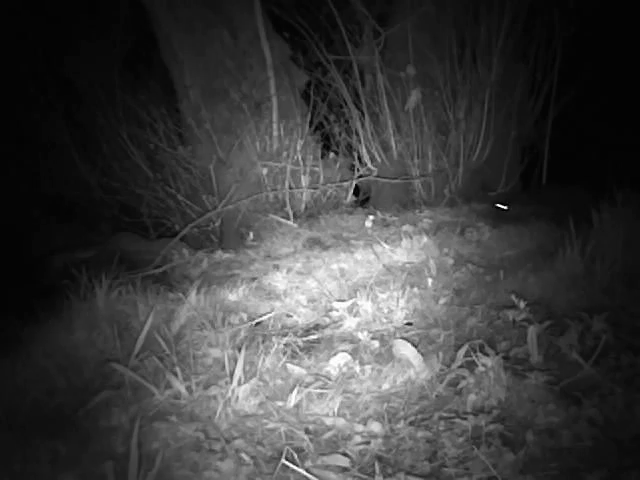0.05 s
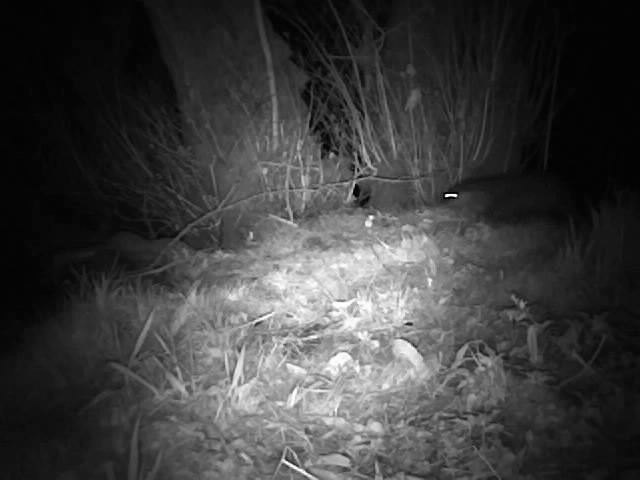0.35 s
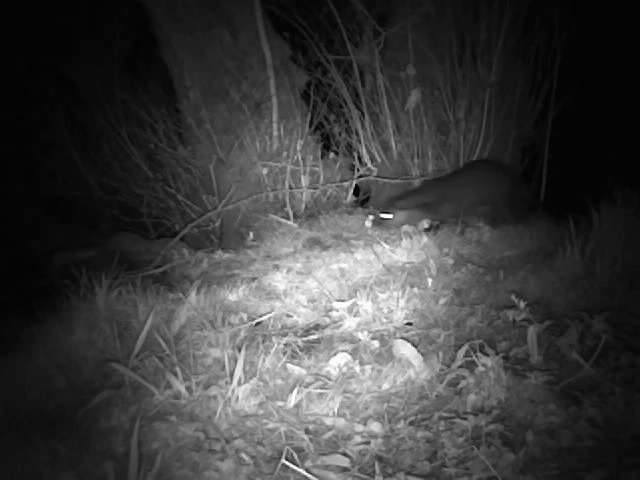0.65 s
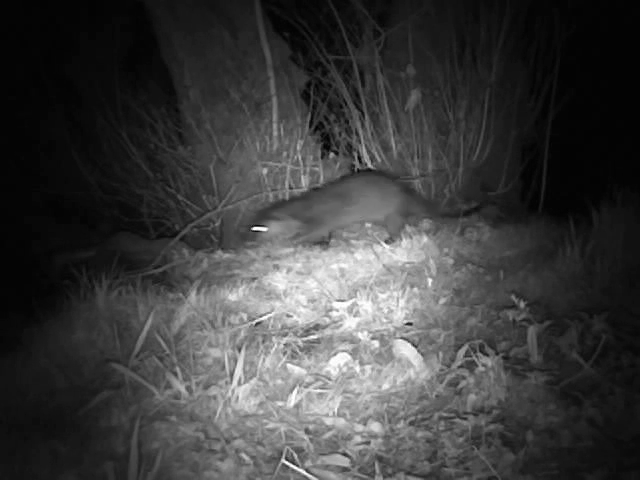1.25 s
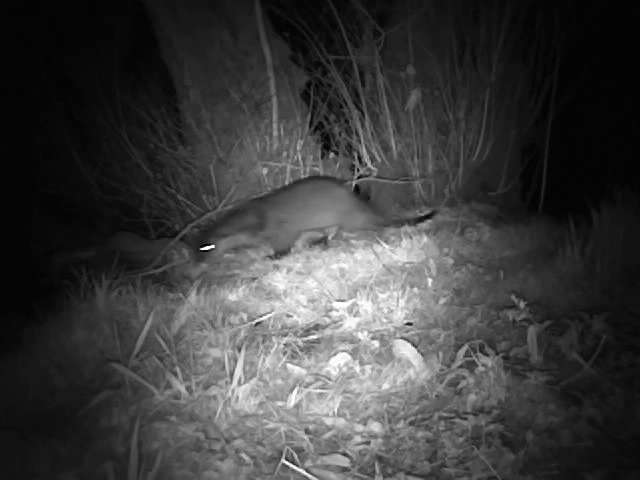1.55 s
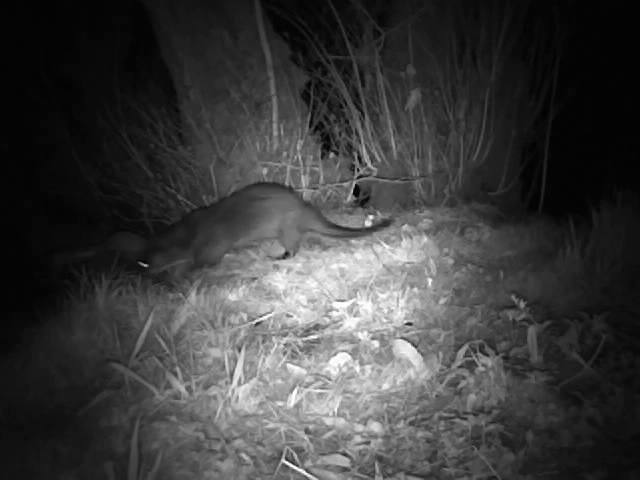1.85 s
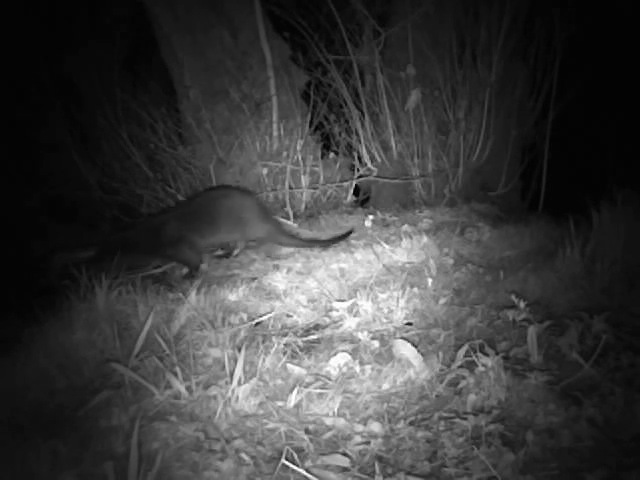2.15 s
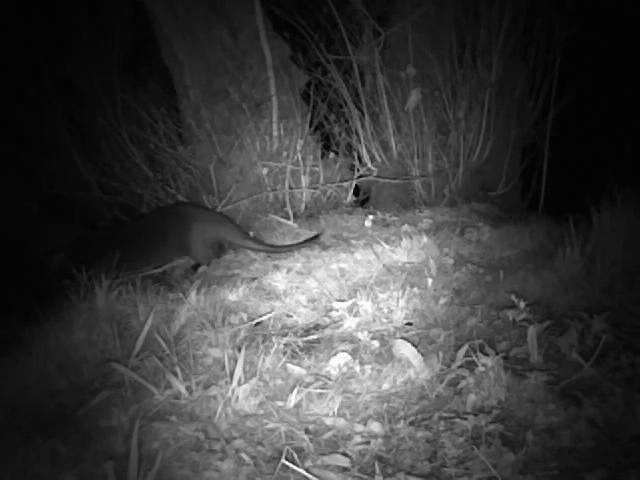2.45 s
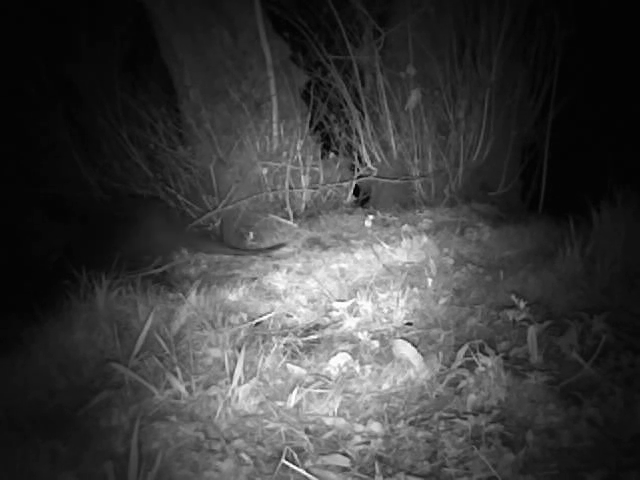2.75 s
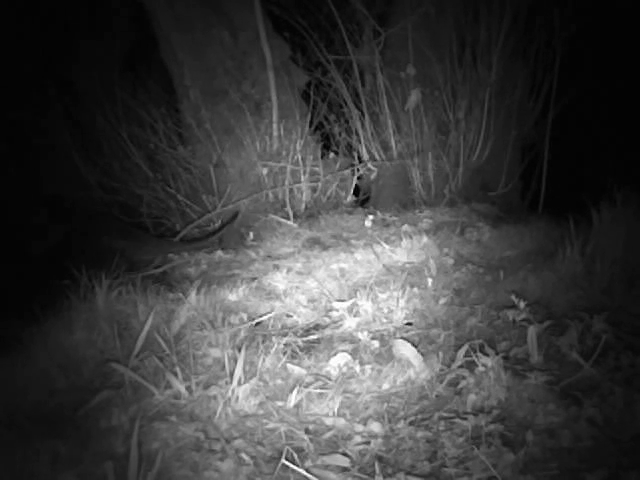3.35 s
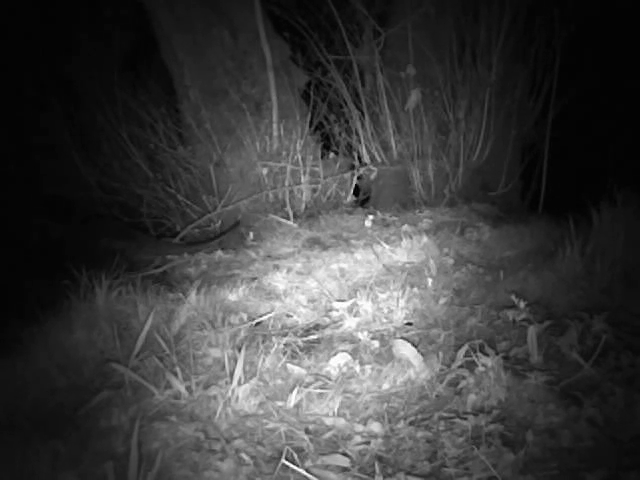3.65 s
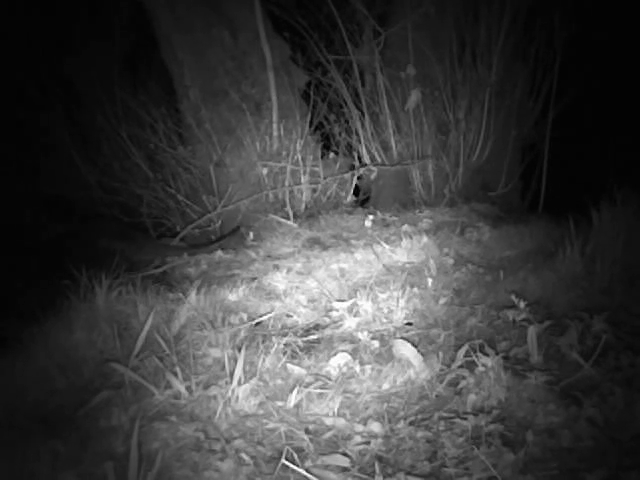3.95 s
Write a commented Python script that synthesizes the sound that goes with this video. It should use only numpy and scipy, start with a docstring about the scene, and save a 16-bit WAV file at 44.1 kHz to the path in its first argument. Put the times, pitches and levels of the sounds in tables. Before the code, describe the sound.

A camera's electronic whine flutters rapidly for all four seconds, with steady hiss, a thin high tone, faint hum and short buzzes three or four times a second. A faint hollow rush swells around 1 to 2 seconds and again after 3. An animal barely brushes leaves at 2.2 and 2.6 seconds, snaps a dry stalk with a quick double crack at 3, then rustles softly until 3.4.

```python
"""A night camera's electronics whine, starting afresh with every picture frame. The camera also makes
a short buzz every few frames (probably as it stores data), a thin high tone, a low hum and a steady hiss.
On the quiet bank outside, an animal walking off through the undergrowth snaps a stalk and brushes
leaves, while a faint hollow rush swells and fades."""
import sys
import numpy as np
from scipy import signal
from scipy.fft import rfft, irfft
from scipy.io import wavfile
from scipy.ndimage import uniform_filter1d

SR = 44100
rng = np.random.default_rng(int(sys.argv[2]) if len(sys.argv) > 2 else 0)


def store_wav(level_fs):
    """Save 16-bit WAV to argv[1]."""
    pcm = np.round(np.clip(np.atleast_2d(level_fs), -1, 1) * 32767)
    wavfile.write(sys.argv[1], SR, pcm.T.astype(np.int16))


N = 176400  # 4 seconds

# How loud each harmonic of the whine is, from the lowest up: level_db
WHINE_HARMONICS = [-47, -54, -66.5, -84.5, -72, -83]
# When the camera buzzes: start_s, level_db
BUZZ_EVENTS = [(0.014, -51.5), (.284, -51.5), (0.619, -48), (0.687, -53), (0.889, -49.5), (1.159, -47),
               (1.425, -53), (1.695, -52), (2.032, -51), (2.299, -50), (2.568, -51), (2.904, -50.5),
               (3.172, -50.5), (3.441, -49), (3.713, -53.5), (3.979, -51)]
# Tone colour of the buzz: pitch_hz, relative_db
BUZZ_SPECTRUM = [(100, -7.5), (300, 7), (490, -9.5), (600, 4.5), (820, 2.5), (1000, -14.5), (1200, -0.5),
                 (1400, -31.5), (1660, -2.5), (2100, -20), (4000, -20), (8000, -35)]
# The thin high tones: pitch_hz, level_db
HIGH_TONES = [(7321, -77.5), (7386, -82), (7515, -86.5), (8000, -54.5)]
# The tones of the low hum: multiple_of_frame_rate, level_db
HUM_TONES = [(5, -61.5), (10, -67)]
# Tone colour of the hiss and its rumble: pitch_hz, relative_db
HISS_SPECTRUM = [(10, -3.5), (30, 2.5), (70, 0.5), (95, -6.5), (145, -7), (185, -9.5), (280, -7),
                 (380, -11.5), (485, -5.5), (560, -13.5), (850, -7.5), (1050, -15), (1500, -19),
                 (2300, -22.5), (4200, -23), (5200, -27), (7600, -26.5), (8200, -31)]
# When the dry stalk cracks: start_s, level_db, decay_s
SNAP_EVENTS = [(3.0135, -36, .006), (3.0565, -44.5, .0025)]
# The notes the stalk rings with: pitch_hz, relative_db, decay_s
STALK_NOTES = [(2730, -18, .016), (3830, -11.5, .018), (4560, -14, .014)]
# Tone colour of dry stalks and leaves: pitch_hz, relative_db
PLANT_SPECTRUM = [(300, -18), (1000, -6), (1500, -5), (2300, -6.5), (3050, -2.5), (3400, -0.5), (3850, 1),
                  (4600, -3), (5300, -14.5), (7500, -14.5)]
# When the animal brushes leaves: start_s, level_db, length_s
BRUSH_EVENTS = [(2.198, -57, 0.045), (2.56, -61, 0.031), (3.081, -59, .025), (3.18, -56, 0.026),
                (3.236, -57.5, 0.036), (3.297, -56, 0.032), (3.339, -54, 0.048)]
# Tone colour of the rush's low body: pitch_hz, relative_db
RUSH_BODY_SPECTRUM = [(60, -25.5), (115, -9.5), (148, -10.5), (175, -12), (225, -5.5), (256, -2), (278, -7),
                      (303, -0.5), (328, -14), (350, -0.5), (385, -17), (560, -22.5), (2000, -49)]
# How that body swells and fades: time_s, level_db
RUSH_BODY_SWELL = [(0, -60), (.62, -58.5), (.85, -50), (1.3, -51.5), (1.42, -46.5), (1.7, -50.5),
                   (2.05, -52), (2.45, -60.5), (3.12, -54.5), (3.36, -50), (3.53, -52.5), (3.65, -49),
                   (4, -57)]
# Tone colour of the rush's hollow ring: pitch_hz, relative_db
RUSH_RING_SPECTRUM = [(100, -40.5), (380, -21.5), (440, -2.5), (478, 3.5), (505, 2.5), (540, -20.5),
                      (620, -15), (680, -6.5), (715, -14.5), (760, -5.5), (900, -19.5), (1500, -27),
                      (4000, -43)]
# How that ring swells and fades: time_s, level_db
RUSH_RING_SWELL = [(0, -55.5), (.68, -53.5), (.98, -47), (1.18, -52), (1.27, -45), (1.57, -51), (1.77, -46),
                   (1.85, -52.5), (2.15, -59), (2.75, -60.5), (3.25, -49.5), (3.55, -63.5), (4, -53)]

FRAME_HZ, FIRST_FRAME_S = 14.8817, .0148


def camera_whine(t):
    """The electronics' tone stops at each picture frame, comes back weakly, then holds at full strength."""
    pitch_hz, jitter_cycles = 928.8, .0074
    pause_s, weak_s = .004, .0115
    frame_age = (t - FIRST_FRAME_S) % (1 / FRAME_HZ)
    wobble = normalise(uniform_filter1d(rng.standard_normal(N), size=48))
    phase = 2 * np.pi * (pitch_hz * frame_age + jitter_cycles * wobble)
    out = 0
    for harmonic, level_db in enumerate(WHINE_HARMONICS, 1):
        weak_gain = gain(-3.5 if harmonic == 1 else -6.5)
        strength = (frame_age > pause_s) * np.where(frame_age < pause_s + weak_s, weak_gain, 1.)
        strength = uniform_filter1d(strength, size=24)  # soften the switching
        out -= np.sqrt(2) * gain(level_db) * strength * np.cos(harmonic * phase)
    return out


def camera_buzzes(t):
    """Short bursts of unevenly timed electric pulses leak into the sound."""
    rate_hz, length_s, jitter_cycles, count = 411.8, .034, .075, 2000
    positions = (np.arange(count) + jitter_cycles * rng.standard_normal(count)) * SR / rate_hz
    pulses = np.bincount(np.abs(positions).astype(int), minlength=N)[:N].astype(float)
    buzz = normalise(colour(pulses - pulses.mean(), BUZZ_SPECTRUM))
    bursts = sum(gain(db) * ((t > start_s) & (t < start_s + length_s)) for start_s, db in BUZZ_EVENTS)
    return buzz * uniform_filter1d(bursts, size=90)


def camera_high_tones(t):
    """The electronics give one thin, steady tone with three much fainter ones just below it."""
    return sum(tone(t, pitch_hz, level_db) for pitch_hz, level_db in HIGH_TONES)


def camera_hum(t):
    """The electronics hum faintly at multiples of the frame rate."""
    return sum(tone(t, multiple * FRAME_HZ, level_db) for multiple, level_db in HUM_TONES)


def amplifier_hiss():
    """The amplifier hisses evenly over a low rumble."""
    return gain(-48.5) * noise(HISS_SPECTRUM)


def stalk_snaps(t):
    """A dry stalk cracks twice; each crack rings briefly and leaves a short tail of noise."""
    tail_db, tail_s = -13, .044
    out, crack = 0, noise(PLANT_SPECTRUM)
    for start_s, level_db, decay_s in SNAP_EVENTS:
        age = np.maximum(t - start_s, 0)
        fade = np.exp(-age / decay_s) + gain(tail_db) * np.exp(-age / tail_s)
        ring = sum(gain(db) * np.exp(-age / ring_s) * np.sin(2 * np.pi * hz * age)
                   for hz, db, ring_s in STALK_NOTES)
        out += gain(level_db) * (t > start_s) * (fade * crack + ring)
    return out


def brushed_leaves(t):
    """Each touch of the leaves sets off a soft cluster of tiny clicks."""
    clicks_per_s = 1600
    touches = sum(gain(db) * np.sin(np.pi * np.clip((t - start_s) / length_s, 0, 1))
                  for start_s, db, length_s in BRUSH_EVENTS)
    clicks = rng.standard_normal(N) * (rng.random(N) < clicks_per_s / SR)
    return touches * normalise(colour(clicks, PLANT_SPECTRUM))


def outdoor_rush(t):
    """A faint rush swells and fades in two layers: a low body and a hollow ring above it."""
    body_db = np.interp(t, *np.transpose(RUSH_BODY_SWELL))
    ring_db = np.interp(t, *np.transpose(RUSH_RING_SWELL))
    return gain(body_db) * noise(RUSH_BODY_SPECTRUM) + gain(ring_db) * noise(RUSH_RING_SPECTRUM)


def gain(db):
    """Turn decibels into a number to multiply by."""
    return 10 ** (np.asarray(db) / 20)


def normalise(x):
    """Scale a sound so that its average strength (rms) is 1."""
    return x / np.sqrt(np.mean(x ** 2))


def tone(t, pitch_hz, level_db):
    """A pure, steady tone at the given average level."""
    return np.sqrt(2) * gain(level_db) * np.sin(2 * np.pi * pitch_hz * t)


def colour(x, spectrum):
    """Make some pitches louder and others softer, following a table of pitch_hz, relative_db."""
    hz, db = np.transpose(spectrum)
    grid_hz = np.maximum(np.arange(N + 1) * SR / (2 * N), 1)
    curve_db = np.interp(np.log(grid_hz), np.log(np.sort(hz)), db)
    cepstrum = irfft(np.log(gain(curve_db)))
    # Fold the second half onto the first, so the filter rings after a click and never before it.
    cepstrum[1:N] *= 2
    cepstrum[N + 1:] = 0
    response = np.exp(rfft(cepstrum))
    return irfft(rfft(x, 2 * N) * response)[:N]


def noise(spectrum):
    """Noise with the given tone colour and an average strength of 1."""
    return normalise(colour(rng.standard_normal(N), spectrum))


def scene():
    """The camera's own noises and the sounds of the bank, in one channel."""
    t = np.arange(N) / SR
    camera = camera_whine(t) + camera_buzzes(t) + camera_high_tones(t) + camera_hum(t) + amplifier_hiss()
    bank = outdoor_rush(t) + stalk_snaps(t) + brushed_leaves(t)
    return (camera + bank)[None]


def record(dry):
    """The camera cuts off the highest treble and shifts the whole wave slightly off zero."""
    cutoff_hz, offset = 8150, .0084
    low_pass = signal.ellip(12, .1, 80, cutoff_hz, fs=SR, output="sos")
    return signal.sosfilt(low_pass, dry) + offset


dry = scene()
out = record(dry)
store_wav(out)
```